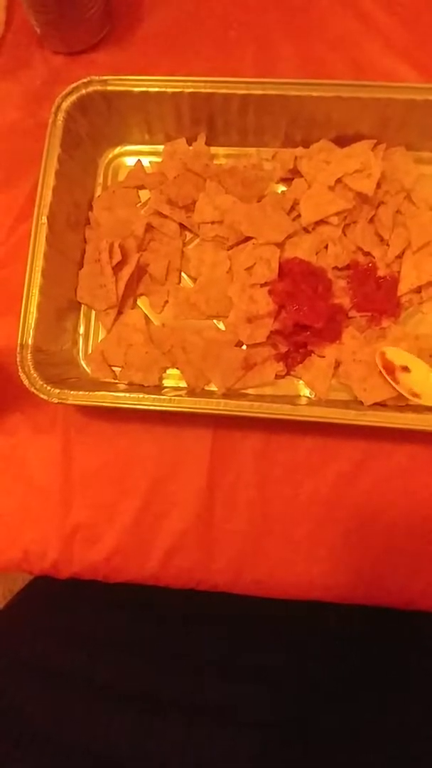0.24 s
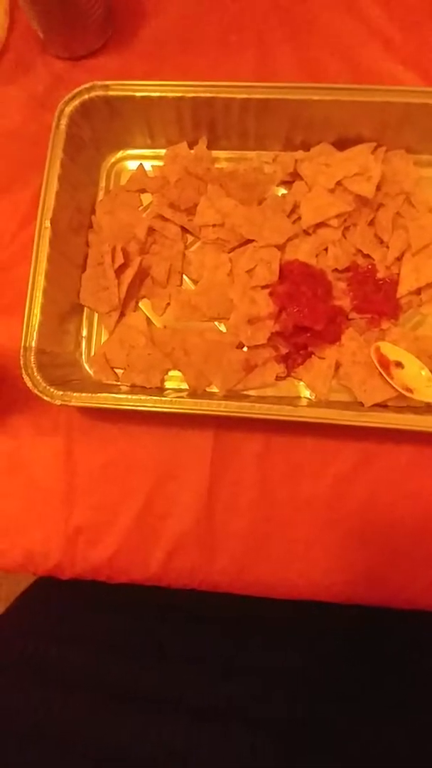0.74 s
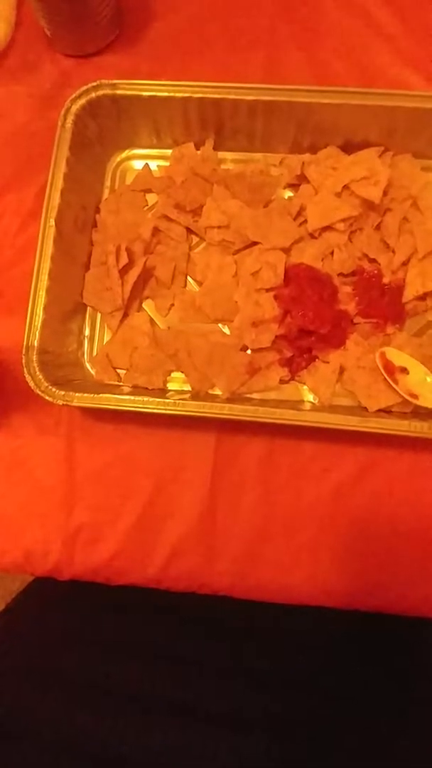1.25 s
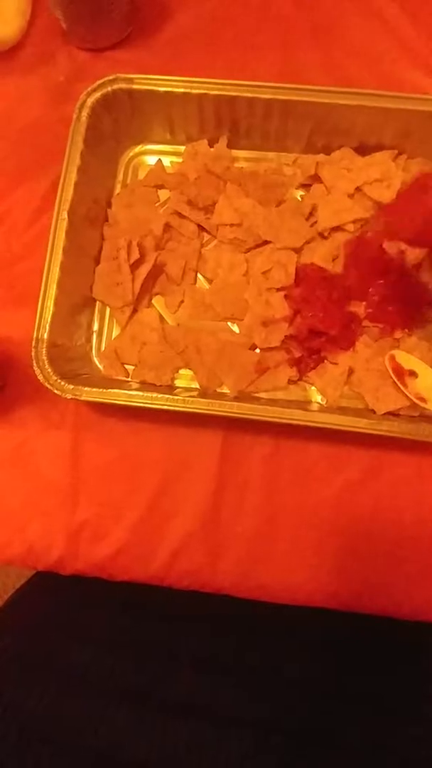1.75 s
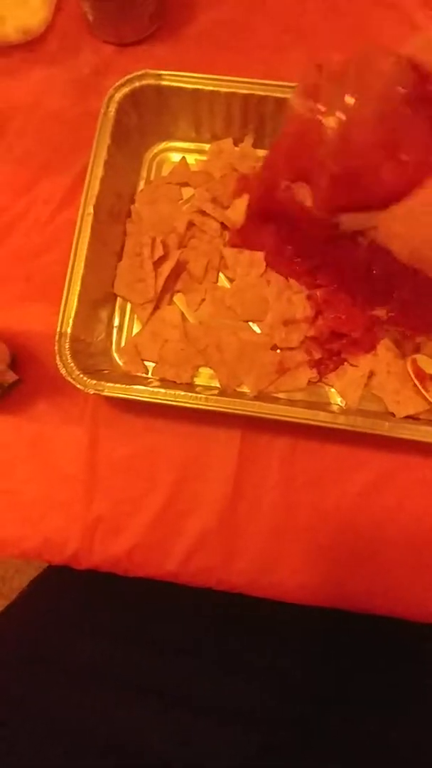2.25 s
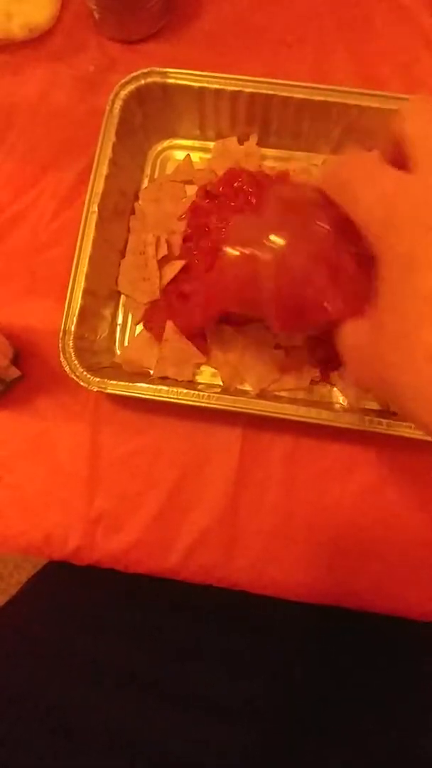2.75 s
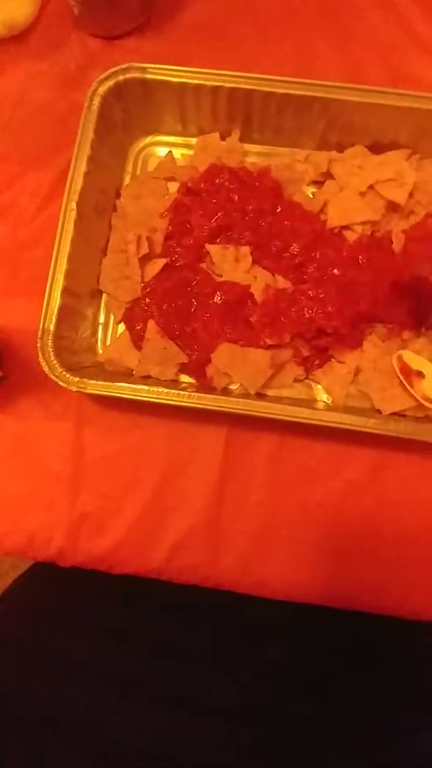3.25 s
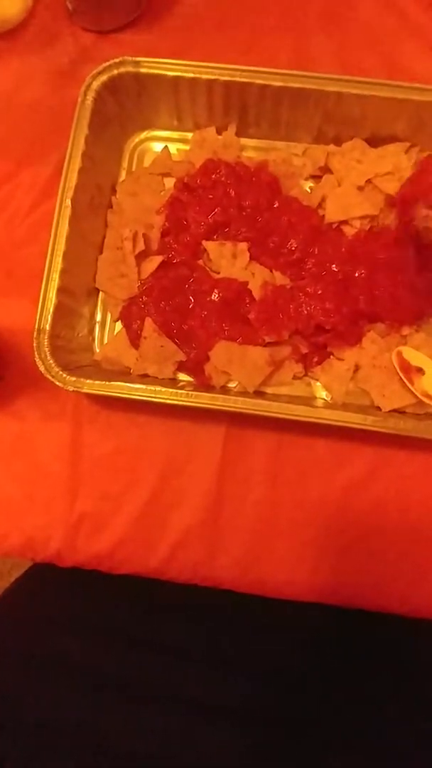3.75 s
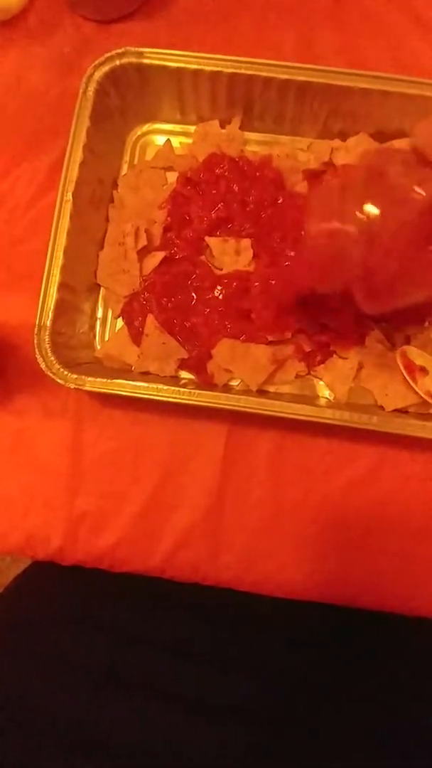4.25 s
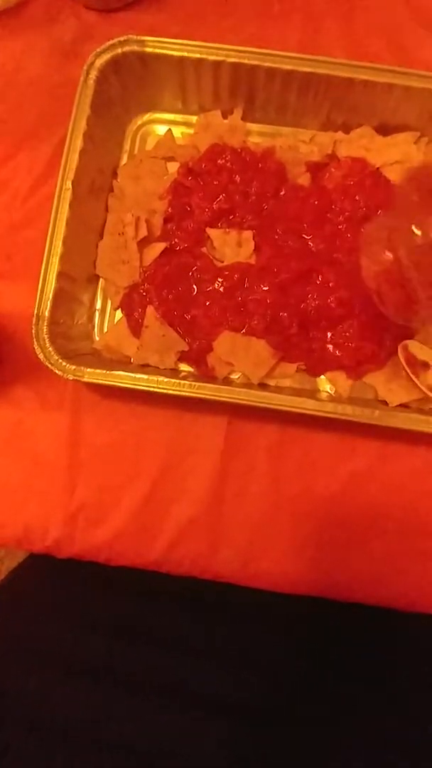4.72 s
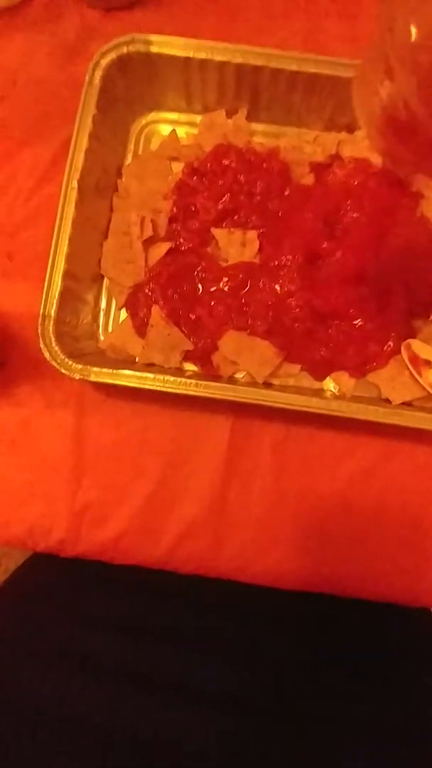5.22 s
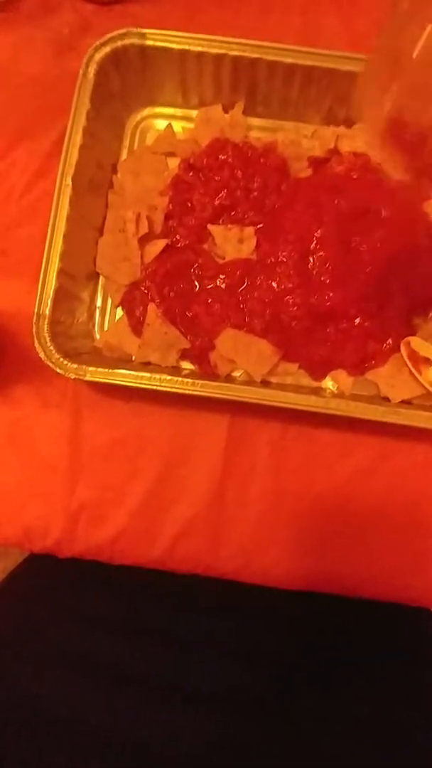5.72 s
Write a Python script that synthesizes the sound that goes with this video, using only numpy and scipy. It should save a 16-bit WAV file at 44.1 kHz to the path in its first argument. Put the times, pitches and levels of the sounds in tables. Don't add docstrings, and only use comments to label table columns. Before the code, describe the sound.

Very close stereo pickup in a small kitchen. At once a utensil bounces three quick times on a thin foil pan, bright and short, with chips squeaking and snapping. A quiet second follows over low rumble and faint hum. Then chips crackle in growing bursts, peaking in a dense crunch just before three seconds, with soft sauce plops beneath. Only small ticks and faint rustles remain afterward.

```python
import sys
import numpy as np
from scipy import signal
from scipy.io import wavfile
from scipy.ndimage import uniform_filter1d

SR = 44100
rng = np.random.default_rng(int(sys.argv[2]) if len(sys.argv) > 2 else 0)


def transcribe(signal):
    frames = np.atleast_2d(signal).T
    limited = np.clip(frames, -1, 1)
    pcm = np.round(limited * 32767).astype(np.int16)
    wavfile.write(sys.argv[1], SR, pcm)


def magnitude_from_level(level_db):
    exponent = np.asarray(level_db, float) / 20
    return 10 ** exponent


N = 263718

# start in seconds, length in seconds, level in dB, heavy pieces in dB relative to that level.
SOGGY_SHIFTS = [(0.2075, .034, -27.5, -2), (0.24, 0.02, -41, 15), (0.324, 0.046, -49, 8.5),
                (0.366, 0.065, -55, 9.5), (2.091, 0.045, -42, -12), (2.405, 0.013, -36.5, -7.5),
                (2.453, 0.024, -64, -6), (2.503, 0.052, -52, -11.5), (2.659, 0.036, -38, -15),
                (3.642, 0.068, -66, -1), (3.692, 0.034, -58.5, 1), (4.077, 0.052, -64.5, -3.5),
                (4.525, 0.031, -43, 0), (4.562, 0.061, -58.5, 7), (4.634, .014, -72, -2),
                (4.679, 0.015, -56, 5.5), (4.708, 0.042, -58, 4), (4.951, 0.035, -58.5, -11)]
DRY_SHIFTS = [(.001, 0.026, -64, 7), (0.032, 0.064, -64.5, 2), (.282, 0.039, -38.5, 9.5),
              (1.404, 0.027, -63.5, -7.5), (1.483, 0.048, -45.5, -5.5), (1.532, 0.033, -58, -15),
              (1.567, 0.051, -43.5, -7.5), (1.639, 0.047, -34, -14), (1.778, 0.048, -40, -19),
              (1.901, 0.052, -58, -9), (1.998, 0.038, -35.5, -18), (2.114, 0.084, -42.5, -13),
              (2.324, 0.04, -48.5, -9), (2.389, 0.021, -46.5, -24), (2.562, 0.09, -44.5, -11),
              (2.709, 0.039, -25.5, -20), (2.734, 0.056, -24, -4), (2.813, 0.062, -32.5, -1.5),
              (2.858, 0.089, -36, -2.5), (2.955, 0.059, -35, 0), (3.025, 0.056, -53.5, -15),
              (3.13, 0.06, -62, -1.5), (3.858, 0.061, -41, -10), (5.781, 0.05, -64, -9),
              (5.923, 0.04, -67, -8), (1.68, 0.083, -63, -11), (1.82, 0.078, -63, -9),
              (2.28, .1, -57, -9.5), (2.42, 0.084, -62.5, -7.5)]
CRISP_SHIFTS = [(0.11, 0.041, -62.5, 7.5), (.471, 0.15, -82.5, -0.5), (.69, 0.074, -75.5, -2),
                (.9, .2, -82, 0), (1.258, .2, -84, 1.5), (1.961, 0.055, -50, -18),
                (2.051, 0.043, -33.5, -22.5), (2.231, 0.04, -53.5, -6), (2.261, 0.033, -47.5, -1.5),
                (2.627, 0.043, -52, 2), (2.796, 0.041, -36.5, -3), (2.901, 0.032, -28, -10),
                (3.214, 0.038, -68.5, 7.5), (3.32, 0.037, -70.5, -1), (4.0, 0.074, -58, -11),
                (4.202, 0.03, -46.5, -11.5), (4.244, 0.044, -64.5, -2), (4.345, 0.051, -66, 6),
                (4.419, 0.045, -68, 1.5), (4.939, 0.019, -68.5, -19), (5.397, 0.041, -49.5, -9),
                (5.431, 0.055, -61, -15)]
FIZZY_SHIFTS = [(.27, 0.0061, -56, -12), (1.443, 0.038, -72.5, 1), (3.905, 0.034, -61, -20),
                (5.067, 0.077, -79, -1.5), (5.145, 0.03, -78.5, 1), (5.206, 0.042, -82, 6),
                (5.56, 0.035, -82.5, 8.5), (5.7, .022, -90, 2.5), (.5, .07, -87, 0), (.63, 0.11, -83, -0.5),
                (.82, 0.064, -80, 2), (1.01, .08, -86.5, -0.5)]
FIZZ_DB = (-14, -4, 1, 11.5)
# frequency in Hz, density in dB per Hz.
CHIP_COLOUR = [(240, -35.5), (400, -11), (529, -18), (781, -10), (1230, -7.5), (1500, -5), (1930, -3),
               (3030, -2), (3370, -1), (4070, -0.5), (7010, -6), (8990, 5), (10700, -8), (15300, -12),
               (16500, -40.5)]

# start in
# seconds, peak in dB, ring in Hz, left over right in dB.
PINGS = [(.119, -30.5, 3414, -4), (0.121, -31, 1910, 2), (0.2302, -19, 9300, 11), (.25, -16, 849.6, 4),
         (.292, -15.5, 800, 8.5), (2.0037, -20, 4200, 0), (2.0095, -21.5, 9000, 8), (2.2793, -18, 3295, -3),
         (2.6295, -26, 2030, 6.5), (2.6649, -24, 1970, 1), (2.686, -31, 2080, 2), (2.7155, -17, 1910, -4),
         (2.754, -21, 1010, -2), (2.7636, -19, 1200, -1), (2.7805, -16.5, 3740, -7), (2.921, -14, 8900, -6),
         (2.986, -26, 1250, 6), (2.996, -36, 1300, 2), (3.1007, -38, 2260, -5), (3.89, -35, 1143, 2),
         (4.535, -35, 1810, -1), (4.549, -44, 1800, 0.5), (4.683, -35.5, 1260, 6.5), (4.718, -37, 3250, -5),
         (1.80, -42, 1840, 4), (5.394, -43, 1300, 0), (5.934, -56, 1270, 1)]
SNAPS = [(0.2729, -20.5, 1010, 1), (0.3012, -19, 2240, -5), (0.339, -26, 1490, -4.5),
         (0.363, -35, 3010, -13), (0.387, -30.5, 3120, -5), (0.389, -36, 3170, -2),
         (0.4116, -46.5, 1010, 7), (0.4288, -46, 1010, 1), (1.5107, -28, 5020, -5), (1.5424, -36, 3320, -5),
         (1.5822, -33, 5000, -11), (1.6186, -47, 9280, -1), (1.666, -17, 5340, 0), (1.8046, -32, 4840, -6),
         (1.8136, -23.5, 3450, -5), (1.8698, -46, 8590, -2), (1.9787, -30, 9110, 9), (1.9922, -35, 8630, 5),
         (2.027, -32, 9190, 0), (2.1942, -37, 9190, 1), (2.206, -44, 9320, -1), (2.2487, -40, 8740, 6),
         (2.2893, -29.5, 8720, 5), (2.3942, -35, 3120, 5), (2.4004, -36, 9000, 5), (2.5958, -26, 5880, 1.5),
         (2.6721, -19, 5190, -3), (2.7235, -13, 2020, -3), (2.7363, -11.5, 1870, -2.5),
         (2.7926, -24.5, 2840, -1), (2.8475, -12.5, 2610, 0), (2.8827, -14, 3880, -2.5),
         (2.909, -14, 8660, -8), (2.9378, -20.5, 2370, -2.5), (2.9808, -19, 9130, -3),
         (3.015, -38, 1270, 8), (3.0653, -42, 5000, 3), (3.7065, -47, 4440, -10), (4.0253, -44, 9370, 6),
         (4.2048, -37, 6830, 0), (4.3625, -45, 8480, 4), (4.3675, -43.5, 8530, 1), (4.4475, -48, 9350, 2),
         (4.611, -44, 3320, -8), (4.9338, -44.5, 5230, 2), (5.4106, -26.5, 5730, 0.5)]
CRACKS = [(0.1258, -35, 1940, -3), (0.3106, -25, 1790, 3), (0.325, -36, 1770, 0), (1.4617, -28, 8700, -1),
          (1.4942, -33, 5000, -8), (1.5188, -38, 4900, -7), (1.6292, -41, 9200, -2), (1.912, -38, 9400, 3),
          (2.0533, -29, 4760, 1), (2.0652, -21, 9660, 4), (2.0709, -22, 3320, -1), (2.0898, -29, 9320, 4),
          (2.1337, -22.5, 3440, 1), (2.159, -25, 9170, 4), (2.3275, -31, 5300, 2), (2.381, -39, 5970, 4),
          (2.4732, -44, 4780, -10), (2.5369, -44, 4520, -3), (2.573, -30, 4600, 0), (2.5783, -33, 3810, -1),
          (2.6081, -23.5, 3900, -9), (2.6334, -31, 9970, -4), (2.751, -13, 8120, -3),
          (2.8036, -15.5, 2000, 0), (2.82, -15.5, 2890, -4), (2.893, -16.5, 1530, 8),
          (3.0051, -20.5, 4360, -2), (3.7125, -49, 2340, -3), (3.8725, -37, 3290, -2.5),
          (3.9165, -37, 3940, -4), (3.9415, -39, 8400, -3), (3.9444, -37.5, 8650, -2),
          (4.0033, -46, 8060, -1), (4.0142, -45, 9500, 2), (4.0293, -45, 8840, -1), (4.033, -39, 9060, 0),
          (4.052, -43, 3570, -15), (4.2325, -46, 8530, -1), (4.5295, -31, 2800, -2), (4.5479, -29, 1005, 4),
          (4.567, -33, 2370, -5), (4.7275, -44.5, 3400, -5), (4.9612, -41.5, 2730, 7),
          (5.0753, -35, 8960, 11.5), (5.4342, -25.5, 9370, -3), (5.463, -43.5, 9400, 1),
          (5.7805, -45.5, 9100, -8)]
TICKS = [(0.2171, -23, 1010, 10), (0.2513, -8, 1800, -1), (0.293, -17.5, 1490, -4), (0.3153, -24, 1810, -3),
         (0.411, -46, 1020, 0), (1.4224, -53, 5710, -1), (1.4248, -48, 4900, -4), (1.4431, -23.5, 10200, 4),
         (1.4853, -37, 9710, 3), (1.487, -34, 10000, 9), (1.5648, -46, 4260, -3), (1.7926, -28, 3140, -2),
         (1.7954, -26, 4430, 1), (1.9624, -45, 9300, -5), (1.971, -35, 9740, -5), (2.0592, -20.5, 9200, 2),
         (2.0931, -18, 9360, 11), (2.1502, -28, 3860, 3), (2.2681, -28.5, 2720, -5),
         (2.411, -16, 4970, 0.5), (2.5688, -37, 4700, -8), (2.5866, -28.5, 9200, 1),
         (2.6414, -21, 9650, -3), (2.7701, -13.5, 8770, -1), (2.863, -17, 4240, -8), (3.0415, -41, 4780, 0),
         (3.1581, -41.5, 9660, 3), (3.162, -39.5, 4140, -12), (4.2117, -28.5, 9800, -2),
         (4.2493, -42, 9070, 3), (4.2522, -30, 8610, 2), (4.2653, -45.5, 8420, -6), (4.3445, -44, 9410, 2),
         (4.436, -46.5, 9140, 2), (4.6196, -54, 2950, -4), (4.6344, -51, 3210, -2), (4.725, -51, 5940, 0),
         (4.9323, -35, 5000, -8.5), (4.9665, -43, 2580, 0), (5.0356, -43.5, 10460, -4),
         (5.1934, -49.5, 8850, 4.5), (5.209, -38, 8350, 2.5), (5.2228, -48, 9000, 3.5),
         (5.3943, -24.5, 11800, -2), (5.4027, -26, 5750, 0), (5.7749, -55, 9540, -8.5),
         (5.7908, -46.5, 8930, -5)]
SQUEAKS = [(2.7185, -6.5, 2040, -1.5), (2.7335, -16.5, 2900, -3), (4.5875, -24.5, 2900, -7),
           (4.591, -38, 2080, -4), (4.6095, -29, 3000, -12), (4.6825, -38, 3650, -6),
           (4.7155, -35.5, 2400, -7), (4.7445, -36.5, 3270, -9.5), (4.72, -37.5, 5950, 0),
           (0.096, -24, 3420, -2.5), (.208, -8, 2900, -1), (.2085, -11, 2900, -1), (4.5475, -22, 915, -1),
           (2.7495, -8.5, 3800, -1.5), (2.7505, -9, 5900, 1.5), (.385, -33.5, 5500, 0),
           (2.9745, -24, 1370, 1), (3.009, -29, 1260, 2)]
# ring t60 in seconds, crack level in dB, rise in seconds, crack decay in seconds.
BREAKS = [
    (0.024, -9, .0003, .0007),
    (0.021, -6.5, 0.0012, 0.0024),
    (0.015, -3, 0.00033, 0.0011),
    (0.014, -2.5, .00012, .0007),
    (.022, -15, .003, .003),
]

# start in seconds, peak in dB, brightness in dB per octave, left over right in dB.
KNOCKS = [
    (0.209, -12.5, -1.5, -1.5),
    (0.243, -2.5, -1.5, -2),
    (0.287, -11, -3, -2),
]
# frequency in Hz, level in dB, t60 in seconds.
PAN_MODES = [(1006, -16, 0.084), (1300, -9.5, 0.05), (1445, -10.5, 0.05), (1855, -2.5, 0.03),
             (3245, -7, 0.04), (3670, -7, 0.04), (3960, -28.5, 0.18), (4900, -8.5, 0.18), (5500, -10, 0.03),
             (6270, -12.5, 0.064), (7660, -30, 0.12), (8610, -19, 0.046), (9250, -11, 0.041),
             (9180, -22, 0.061)]
# start in seconds, peak in dB, push in Hz, pan floor in Hz, pan floor level in dB.
PLOPS = [
    (2.1945, -38, 670, 227.5, 0),
    (2.2725, -35.5, 700, 265, -3),
    (0.27, -56, 250, 118, 4),
    (1.66, -48.5, 370, 410, 3),
    (2.80, -46, 1100, 260, 6),
]

# frequency in Hz, t60 in seconds.
KITCHEN_DECAY = [(400, 0.5), (1500, 0.24), (4000, 0.065), (10000, 0.078)]
# frequency in Hz, density in dB per Hz.
ROOM_COLOUR = [(12, -39), (20, 1), (48, 3.5), (82, -18), (124, -7.5), (179, -10.5), (351, -12),
               (521, -21.5), (709, -18.5), (1050, -28.5), (2660, -42.5), (9410, -45), (10800, -51),
               (14300, -45), (16500, -66)]
# frequency in Hz, correlation from -1 to 1.
ROOM_LIKENESS = [(60, 0.92), (130, 0.92), (290, 0.92), (640, 0.32), (1410, -0.74), (3100, -0.13),
                 (6820, -0.36), (15000, -0.23)]
# frequency in Hz, rms level in dB.
HUM_LINES = [(118.4, -58), (226.1, -65.5), (339.1, -69), (414.5, -69)]


def crunches():
    rise, fall, after = 0.38, 0.5, 0.65
    ring_share = 0.75
    kinds = (SOGGY_SHIFTS, DRY_SHIFTS, CRISP_SHIFTS, FIZZY_SHIFTS)
    shifts = [(*row, fizz_db) for kind, fizz_db in zip(kinds, FIZZ_DB) for row in kind]
    slow = uniform_filter1d(uniform_filter1d(rng.standard_normal(N), size=150), size=150)
    clump = magnitude_from_level(1.17 * evened(slow))
    size = uniform_filter1d(swarm(4200, 3.5), size=9) * clump
    shard_edges_hz = [(2790, 5900), (773, 2560), (7880, 16000)]
    shared = (0, 0.3, 0)
    out = np.zeros((2, N))
    for band, taps in enumerate(chip_bands()):
        push = np.zeros(N)
        for s, length, db, heavy_db, fine_db in shifts:
            u = np.arange(0, 1 + after, 1 / (SR * length))
            swell = np.clip(u / rise, 0, 1) ** 2
            fade = np.clip((1 + after - u) / (fall + after), 0, 1) ** 2
            add(push, s, magnitude_from_level(db + (0, heavy_db, fine_db)[band]) * swell * fade)
        grit = size * rng.standard_normal((2, N))
        cracks = evened(signal.oaconvolve(grit, taps[None], axes=1)[:, :N])
        rings = shards(*shard_edges_hz[band], clump)
        sound = push * (np.sqrt(1 - ring_share) * cracks + np.sqrt(ring_share) * rings)
        out += sound + shared[band] * sound[::-1]
    return out


def chip_bands():
    hz = np.fft.rfftfreq(4096, 1 / SR) + 1
    colour = read(CHIP_COLOUR, hz)

    def above(edge_hz):
        return -10 * np.log10(1 + (edge_hz / hz) ** 8)

    def below(edge_hz):
        return -10 * np.log10(1 + (hz / edge_hz) ** 8)

    return [causal(colour + cut) for cut in (above(2500) + below(7000), below(2500), above(7000))]


def swarm(per_s, spread_db):
    size = magnitude_from_level(spread_db * np.minimum(rng.exponential(1, N), 2.3))
    return size * (rng.random(N) < per_s / SR)


def shards(lo_hz, hi_hz, clump):
    count, cycles = 7, 14.0
    span = hi_hz / lo_hz
    steps = (np.arange(count) + rng.random(count)) / count
    out = np.zeros((2, N))
    for hz in lo_hz * span ** steps:
        turns = np.arange(1200) / SR * hz
        ring = np.sin(2 * np.pi * turns) * np.exp(-3 * turns / cycles)
        ring *= magnitude_from_level(read(CHIP_COLOUR, hz)) * np.sqrt(hz)
        clicks = clump * swarm(300, 4.0) * rng.standard_normal((2, N))
        out += signal.oaconvolve(clicks, ring[None], axes=1)[:, :N]
    return evened(out)


def breaking_pieces():
    t, f = np.arange(1400) / SR, np.fft.rfftfreq(1024, 1 / SR) + 1
    quarter_turn = np.array([[0], [np.pi / 2]])
    kinds = (PINGS, SNAPS, CRACKS, TICKS, SQUEAKS)
    pieces = [(*row, *rule) for kind, rule in zip(kinds, BREAKS) for row in kind]
    out = np.zeros((2, N))
    for s, db, hz, pan_db, t60, crack_db, rise_s, crack_s in pieces:
        rise = 1 - np.exp(-t / rise_s)
        octaves = np.log2(f / hz)
        tilt = 3.2 * octaves - np.minimum(6 * (octaves / 0.76) ** 2, 30)
        colour = causal(read(CHIP_COLOUR, f) + tilt)
        burst = rng.standard_normal((2, 600)) * (rise * np.exp(-t / crack_s))[:600]
        crack = signal.fftconvolve(burst, colour[None], axes=1)
        modes = np.zeros((2, len(t)))
        for k in range(4):
            mode_hz = hz * (1 + 0.019 * (k - 1.5 + 0.3 * rng.standard_normal()))
            phase = 3 * rng.standard_normal() + quarter_turn * rng.choice([-1, 1])
            modes += 0.7 * np.cos(2 * np.pi * mode_hz * t + phase)
        sound = magnitude_from_level(-9 - 60 * t / t60) * modes * rise * (1 - np.exp(-t / 0.0005))
        add(sound, 0, magnitude_from_level(crack_db) * crack / abs(crack).max(1, keepdims=True))
        add(out, s, sides(pan_db) * magnitude_from_level(db + 1.0) * sound)
    wall_echo = np.roll(out, round(0.0016 * SR), axis=1)
    return out + magnitude_from_level(-9) * wall_echo


def knocks():
    t, hz = np.arange(8000) / SR, np.fft.rfftfreq(4096, 1 / SR) + 1
    out = np.zeros((2, N))
    for s, db, tilt_db, pan_db in KNOCKS:
        ring = np.zeros((2, len(t)))
        for mode_hz, mode_db, t60 in PAN_MODES:
            phase = 2 * np.pi * rng.random((2, 1))
            heard_hz = mode_hz * (1 + 0.011 * np.sin(9 * phase))
            level_db = mode_db + tilt_db * np.log2(mode_hz / 2500)
            decay = magnitude_from_level(level_db - 60 * t / min(t60, 0.045))
            ring += decay * np.sin(2 * np.pi * heard_hz * t + phase)
        tilt = (tilt_db - 3.5) * np.log2(hz / 2500)
        low_cut = -10 * np.log10(1 + (750 / hz) ** 6)
        colour = causal(read(CHIP_COLOUR, hz) + tilt + low_cut)
        burst = rng.standard_normal((2, len(t))) * np.exp(-t / 0.004)
        rattle = signal.oaconvolve(burst, colour[None], axes=1)[:, :len(t)]
        sound = (magnitude_from_level(-6) * ring + magnitude_from_level(-8.5) * rattle) * (1 - np.exp(-t / 0.0005))
        add(out, s, sides(pan_db) * magnitude_from_level(db) * sound)
    return out


def plops():
    t = np.arange(6000) / SR
    out = np.zeros((2, N))
    for s, db, hz, floor_hz, floor_db in PLOPS:
        u = t * hz / 1.6
        push = 2 * u * np.exp(-2 * u) * np.sin(2 * np.pi * hz * t)
        wobble = 1 + 0.58 * evened(uniform_filter1d(rng.standard_normal(len(t)), size=300))
        decay = magnitude_from_level(floor_db - 8.0 - 60 * t / 0.14) * (1 - np.exp(-t / 0.0032))
        boom = decay * wobble * np.sin(2 * np.pi * floor_hz * t)
        add(out, s, magnitude_from_level(db + 7.5) * (push + boom))
    return out


def kitchen(x):
    taps = np.zeros((2, SR // 2))
    at = np.arange(100, SR // 2 - 20, 20)
    at = at + rng.integers(0, 20, (2, len(at)))
    np.put_along_axis(taps, at, rng.choice([-1., 1.], at.shape), 1)
    hz, t, z = signal.stft(taps, SR, nperseg=256)
    decay = magnitude_from_level(-60 * t / read(KITCHEN_DECAY, hz)[:, None])
    tail = signal.istft(z * decay, SR, nperseg=256)[1]
    return signal.fftconvolve(x, tail / np.linalg.norm(tail[0]), axes=1)[:, :N]


def room_tone():
    frames, hz = N // 512 + 5, np.fft.rfftfreq(2048, 1 / SR)
    a, b, c, d, patches = rng.standard_normal((5, len(hz), frames))
    patches = uniform_filter1d(uniform_filter1d(patches, size=8, axis=0), size=6, axis=1)
    same = read(ROOM_LIKENESS, hz)[:, None]
    left = a + 1j * b
    right = same * left + np.sqrt(1 - same ** 2) * (c + 1j * d)
    level = magnitude_from_level(read(ROOM_COLOUR, hz)[:, None] + 0.7 * evened(patches))
    noise = signal.istft(np.array([left, right]) * level, nperseg=2048, noverlap=1536)[1]
    return magnitude_from_level(-48) * evened(noise[:, :N])


def appliance_hum():
    out = np.zeros(N)
    for hz, db in HUM_LINES:
        waver = evened(uniform_filter1d(rng.standard_normal(N), size=4000))
        out += np.sqrt(2) * magnitude_from_level(db) * np.sin(2 * np.pi * np.cumsum(hz + 1.5 * waver) / SR)
    return out


def evened(x):
    return x / np.sqrt(np.mean(x ** 2) + 1e-20)


def read(points, hz):
    f, value = np.transpose(points)
    return np.interp(np.log(hz + 1), np.log(f + 1), value)


def sides(pan_db):
    return magnitude_from_level(np.array([[pan_db / 2], [-pan_db / 2]]))


def add(mix, s, sound):
    part = mix[..., round(s * SR):][..., :sound.shape[-1]]
    part += sound[..., :part.shape[-1]]


def causal(db):
    log = np.log(10) / 20 * np.maximum(np.r_[db, db[-2:0:-1]], -100)
    taps = np.fft.ifft(np.exp(np.conj(signal.hilbert(log)))).real[:512]
    return taps / np.linalg.norm(taps)


def scene():
    near = crunches() + breaking_pieces() + knocks() + plops()
    near = signal.lfilter(*signal.iirnotch(10700, 18, SR), near)
    return near + magnitude_from_level(-9.0) * kitchen(near) + room_tone() + appliance_hum()


def band_limit(x):
    return signal.sosfilt(signal.butter(12, 16820, fs=SR, output="sos"), x)


def record(dry):
    edge = signal.firwin(255, 15950, window=("kaiser", 9), fs=SR)
    mix = signal.oaconvolve(dry, edge[None], "same", axes=1)
    return band_limit(mix)


dry = scene()
out = record(dry)
transcribe(out)
```